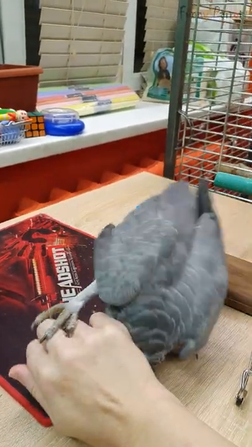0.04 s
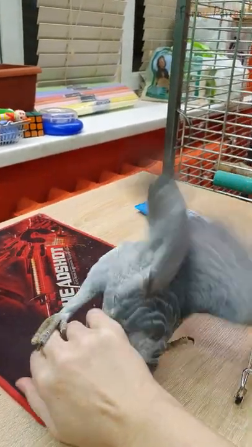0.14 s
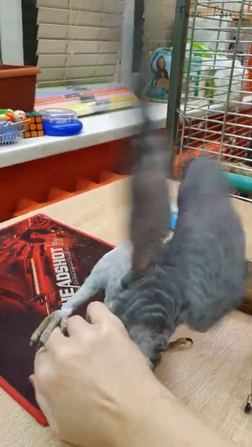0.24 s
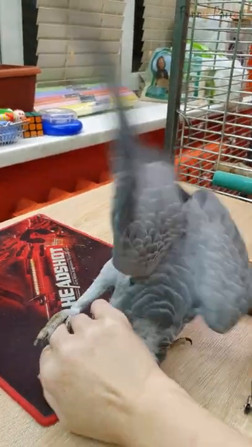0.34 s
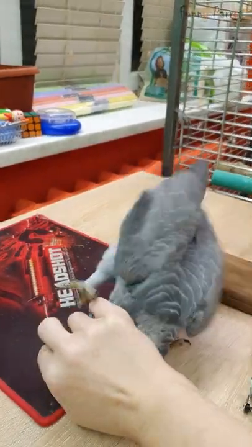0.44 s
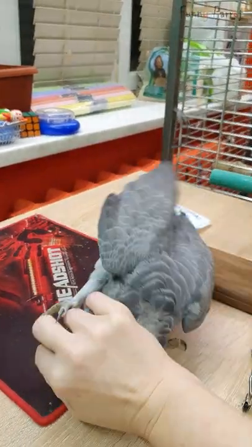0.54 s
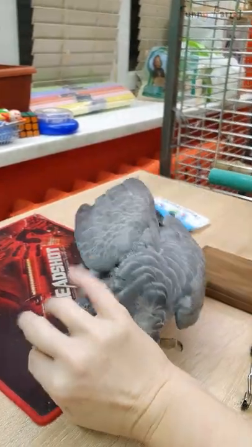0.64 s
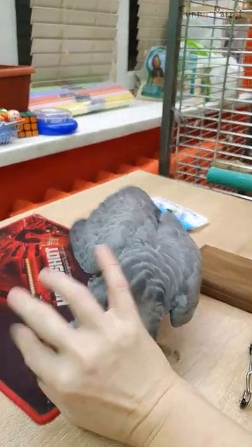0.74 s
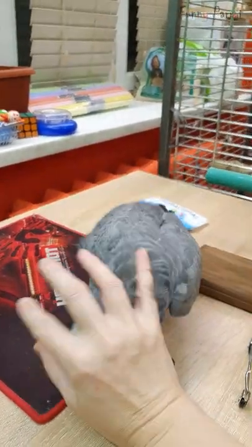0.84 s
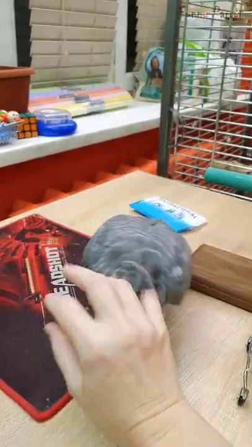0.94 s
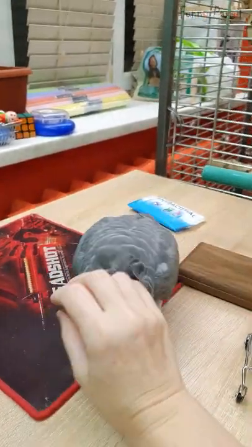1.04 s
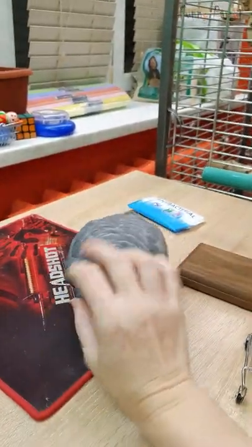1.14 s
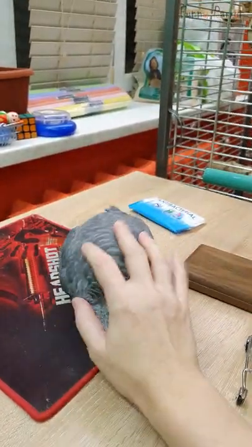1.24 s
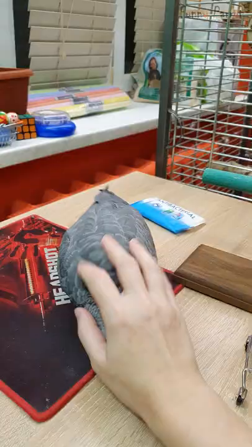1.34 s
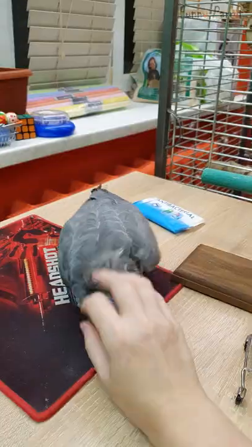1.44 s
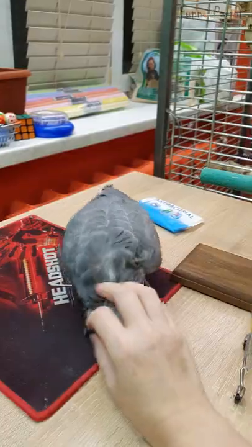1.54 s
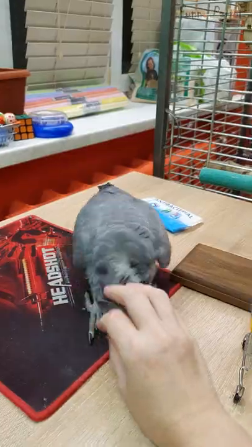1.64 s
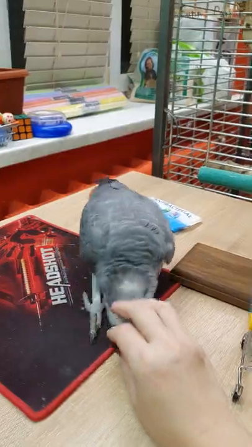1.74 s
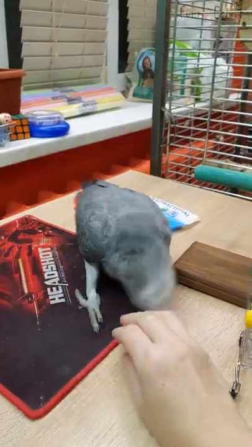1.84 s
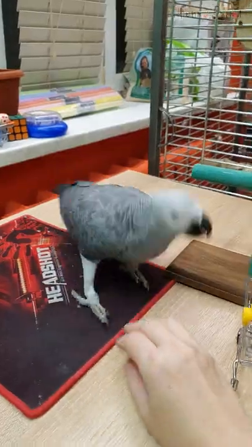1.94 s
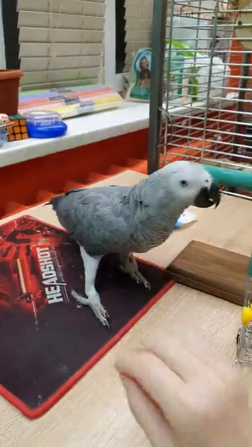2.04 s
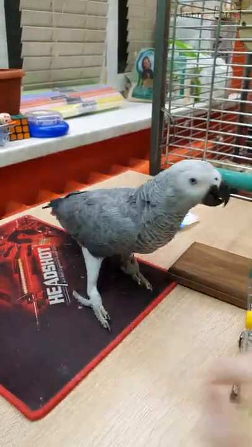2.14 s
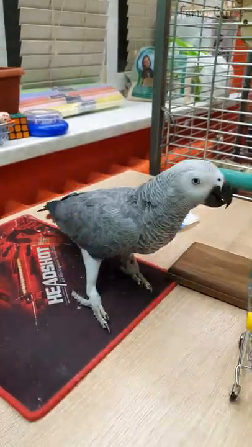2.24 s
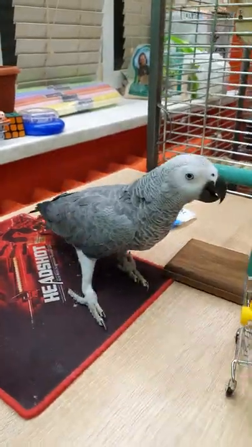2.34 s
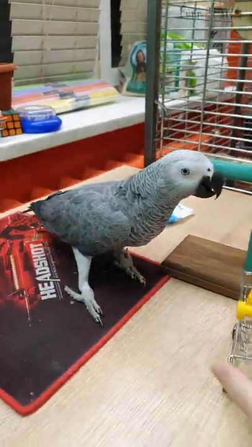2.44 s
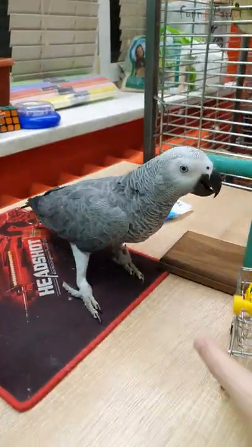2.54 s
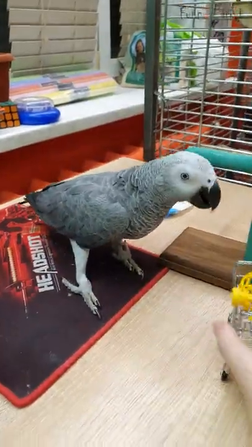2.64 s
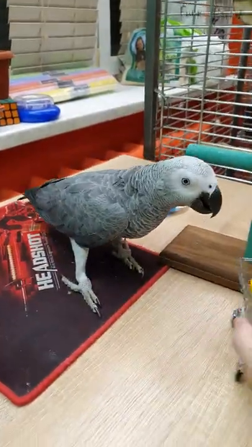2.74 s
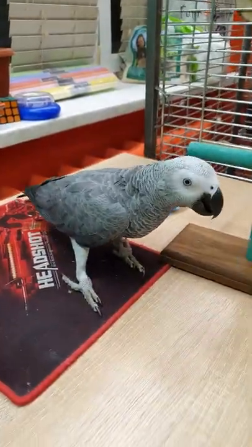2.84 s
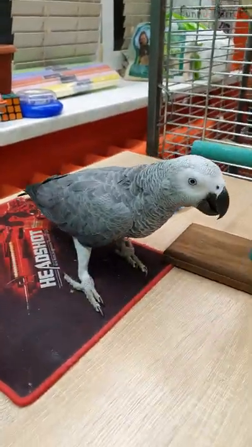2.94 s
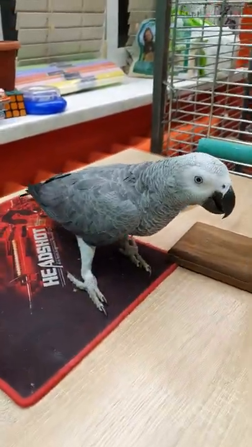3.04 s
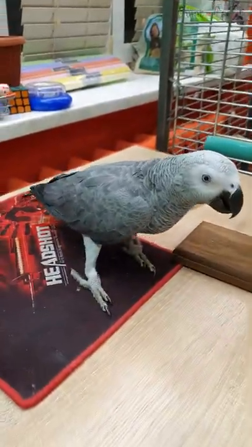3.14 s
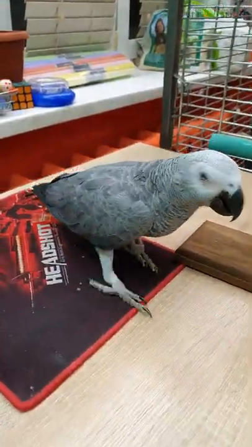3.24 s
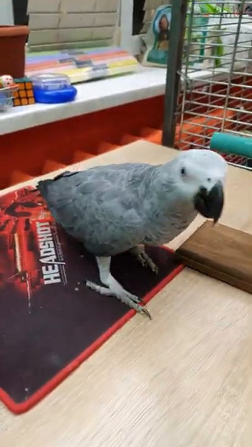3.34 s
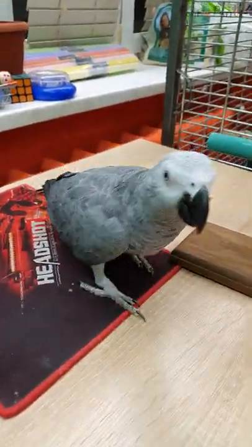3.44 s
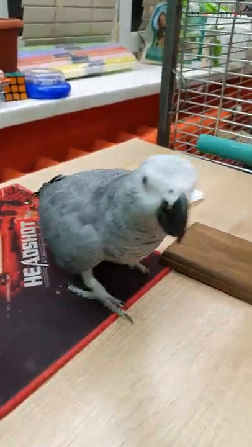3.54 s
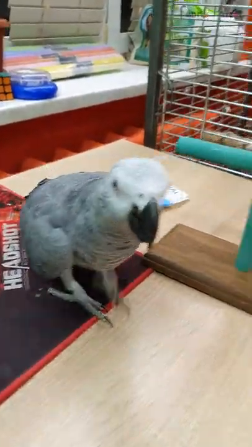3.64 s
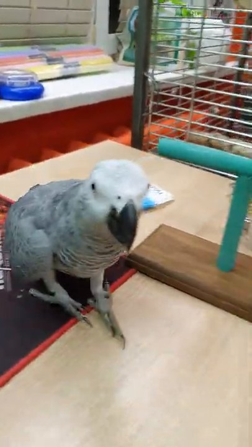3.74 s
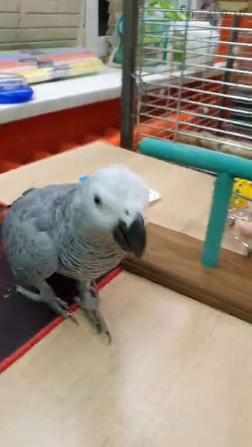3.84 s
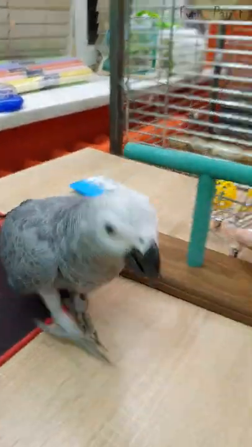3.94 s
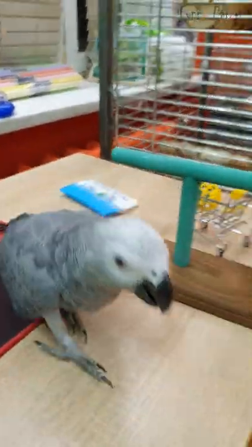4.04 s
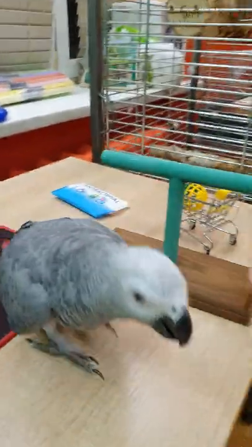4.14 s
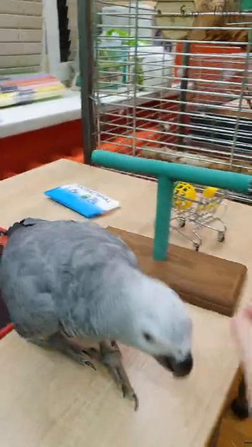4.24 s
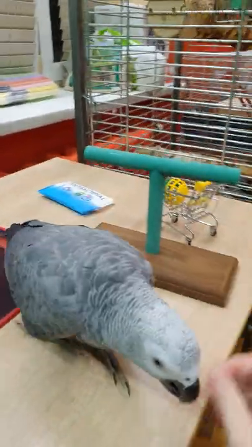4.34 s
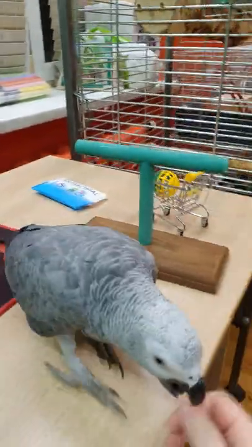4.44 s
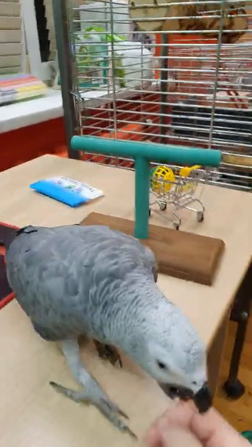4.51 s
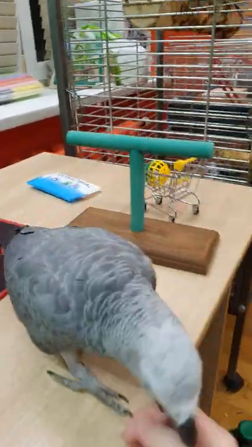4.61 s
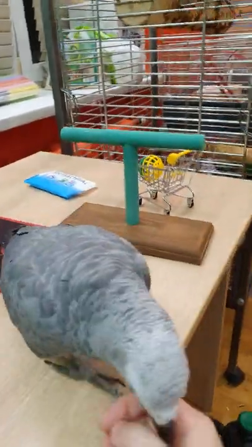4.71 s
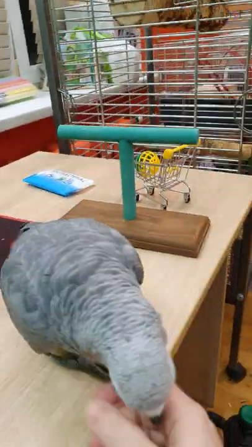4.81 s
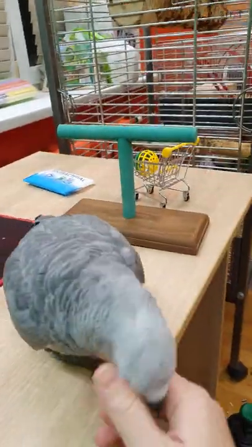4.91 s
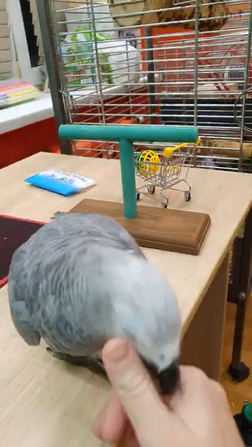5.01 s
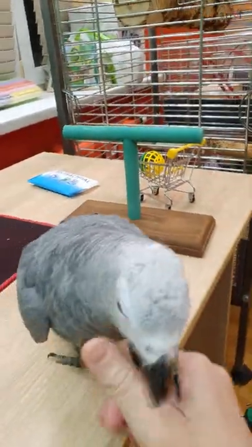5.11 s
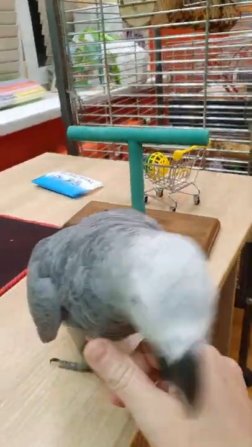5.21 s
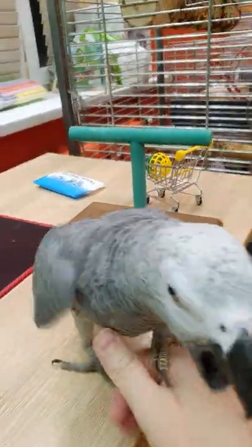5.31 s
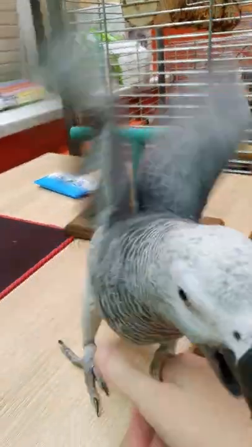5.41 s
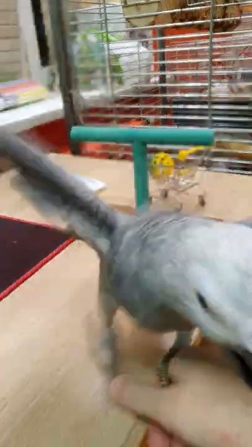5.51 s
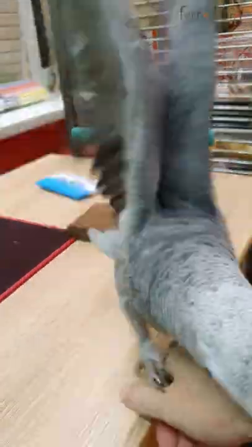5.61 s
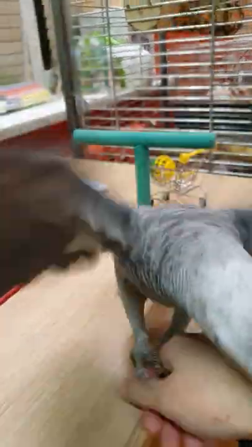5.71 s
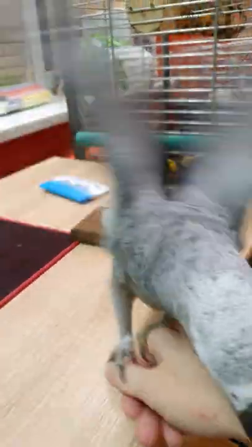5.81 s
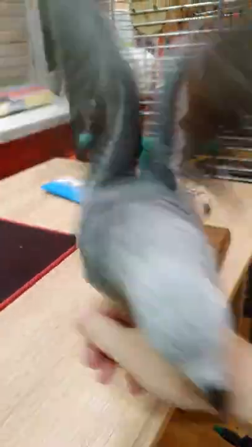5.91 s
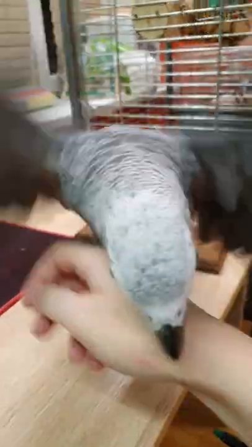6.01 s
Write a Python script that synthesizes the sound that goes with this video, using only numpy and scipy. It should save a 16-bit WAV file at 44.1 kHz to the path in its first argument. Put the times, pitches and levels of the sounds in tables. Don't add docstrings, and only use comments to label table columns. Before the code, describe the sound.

A parrot scuffles on a wooden desk with ticking claws, a wire toy jingles, a wooden stand scrapes hard, then wings flap and buffet the microphone.

```python
import sys
import numpy as np
from scipy import signal
from scipy.fft import rfft, irfft
from scipy.io import wavfile
from scipy.ndimage import uniform_filter1d

SR = 44100
rng = np.random.default_rng(int(sys.argv[2]) if len(sys.argv) > 2 else 0)


def digitize_waveform(pressure):
    field = np.atleast_2d(pressure).T
    bounded = np.clip(field, -1, 1)
    quanta = np.round(bounded * 32767).astype(np.int16)
    wavfile.write(sys.argv[1], SR, quanta)


def convert_level_to_amplitude(level_db):
    exponent = np.asarray(level_db, float) / 20
    return 10 ** exponent


N = 267510

# start_s, left_minus_right_db
BEARING = [(0.0, 0), (0.98, 0.5), (1.11, -4), (1.23, 2), (2.64, -2.5), (2.96, 3.5), (3.21, -3), (3.34, 6.5),
           (4.07, -1), (5.19, 4.5), (5.4, 1), (6.07, 2.5)]
# start_s, peak_db
LINK_FLICKS = [(2.743, -41), (2.769, -43), (2.83, -40), (2.8554, -32.5), (2.869, -40), (2.877, -37),
               (2.8902, -35.5), (2.905, -36.5), (2.918, -44.5), (2.93, -32.5), (2.94, -41.5),
               (2.947, -39.5), (2.966, -37.5), (2.993, -28.5), (2.998, -37.5), (3.014, -26), (3.022, -40),
               (3.037, -39), (3.045, -38.5), (3.061, -46.5), (3.0849, -38.5), (3.168, -44), (3.245, -42.5),
               (3.256, -46.5)]


def unit(x):
    return x / np.sqrt(np.mean(x ** 2))


def band(x, lo_hz, hi_hz, order=3):
    edges_hz = [lo_hz, min(hi_hz, .47 * SR)]
    return signal.sosfilt(signal.butter(order, edges_hz, "band", fs=SR, output="sos"), x)


def curve(rows):
    s, *columns = np.transpose(rows)
    return [np.interp(np.arange(N) / SR, s, c) for c in columns]


def spans(tables, fade_s):
    rows = [np.array(t, float) for t in tables]
    before = [t[:1].copy() for t in rows]
    after = [t[-1:].copy() for t in rows]
    for a, b, following in zip(before, after, rows[1:] + [[[N]]]):
        a[0, :2] = a[0, 0] - .002, -110
        b[0, :2] = min(b[0, 0] + fade_s, following[0][0] - .0021), -110
    return curve(np.concatenate([np.concatenate(x) for x in zip(before, rows, after)]))


def envelope(*tables):
    return convert_level_to_amplitude(spans(tables, 0.088)[0])


def flicker(rate_hz, db):
    k = int(SR / rate_hz)
    steps = np.repeat(rng.standard_normal(N // k + 1), k)
    return convert_level_to_amplitude(db * uniform_filter1d(steps, k)[:N])


def ring(x, modes):
    out = 0
    for hz, db, t60 in modes:
        r = np.exp(-np.log(1000) / (max(t60, .001) * SR))
        w = 2 * np.pi * hz / SR
        out = out + signal.lfilter([0, convert_level_to_amplitude(db) * r * np.sin(w)], [1, -2 * r * np.cos(w), r * r], x)
    return out


def rub(x, peaks):
    modes = [(hz, db + 20 * np.log10(w), np.log(1000) / np.pi / w) for hz, w, db in peaks]
    return unit(ring(x, modes))


def grains(per_s, scatter_db, channels=1):
    shape = (channels, N)
    happens = rng.random(shape) < per_s / SR
    size = convert_level_to_amplitude(scatter_db * rng.exponential(size=shape))
    return happens * size * rng.choice([-1., 1.], shape)


def impulses(events, offset_db):
    out = np.zeros(N)
    for s, db in events:
        out[int(s * SR)] = convert_level_to_amplitude(db + offset_db)
    return out


def decaying_tones(events, rise_s):
    out, t = np.zeros(N + 8192), np.arange(8192) / SR
    for s, db, hz, t60 in events:
        fade = np.minimum(t / rise_s, 1) * convert_level_to_amplitude(db - 60 * t / t60)
        out[int(s * SR):][:len(t)] += np.sin(2 * np.pi * hz * t) * fade
    return out[:N]


def strokes(s, length_s, db, t60, rise):
    s, length_s, db, t60 = (np.reshape(v, (-1, 1)) for v in (s, length_s, db, t60))
    t = np.arange(0, N, 16) / SR - s
    since = np.maximum(t - length_s, 0)
    onset = np.clip(t / (rise * length_s), 0, 1) ** 2
    return (onset * convert_level_to_amplitude(db - 60 * since / t60 - 59.0 * since ** 2)) ** 2, since


def summed(power):
    return np.sqrt(np.repeat(power.sum(0), 16)[:N])


def spread(x, pan_db):
    return x * convert_level_to_amplitude(np.array([pan_db, -pan_db]).reshape(2, -1) / 2)


def ticks(events, length_s):
    size = 2048
    near, sent = np.zeros((2, N + size)), np.zeros(N + size)
    t, f = np.arange(size) / SR, np.fft.rfftfreq(size, 1 / SR) + 1
    shape = np.exp(-np.abs(t - .002) / np.where(t < .002, .00015, length_s))
    noises = rng.standard_normal((len(events), 2, size))
    for (s, db, hz, octaves, wet_db), noise in zip(events, noises):
        colour = 1 / (1 + (np.log2(f / hz) / octaves) ** 4)
        noise = noise[0] + 0.63 * noise[1] * np.array([[1], [-1]])
        burst = irfft(rfft(noise * shape) * colour)
        burst = burst * convert_level_to_amplitude(db) / np.abs(burst.mean(0)).max()
        i = int((s - .001) * SR)
        near[:, i:i + size] += spread(burst, np.interp(s, *np.transpose(BEARING)))
        round_colour = (1 + (np.log2(f / (0.84 * hz)) / octaves) ** 4) ** -.7
        click = np.roll(irfft(round_colour), 100)
        same_energy = np.sqrt(np.sum(burst ** 2) / np.sum(click ** 2) / 2)
        sent[i:i + size] += click * same_energy * convert_level_to_amplitude(wet_db)
    return near[:, :N], sent[:N]


def floor():
    # pitch_hz, level_db (per Hz)
    spectrum = [(12, -46), (20, 4), (160, -17.5), (400, -22.5), (900, -26.5), (1390, -34.5), (9000, -71),
                (11700, -101)]
    # pitch_hz, width_hz, level_db (over the floor)
    hums = [(117, 2.3, 8), (217, 91, 7), (352.7, 8.3, 13.5), (440, 54, 6)]
    f = np.fft.rfftfreq(N, 1 / SR) + 1
    hz, db = np.transpose(spectrum)
    colour = convert_level_to_amplitude(np.interp(np.log(f), np.log(hz), db))
    colour = colour * convert_level_to_amplitude(sum(db * np.exp(-((f - hz) / w) ** 2) for hz, w, db in hums))
    colour = colour / (1 + (41 / f) ** 12)
    mid, side = rfft(rng.standard_normal((2, N)))
    side = side * np.clip(f / 600, .3, 1)
    hiss = unit(irfft(colour * np.array([mid + side, mid - side]), N))
    return hiss * convert_level_to_amplitude(-58.5) * flicker(1.9, 1.0)


def stir():
    # start_s, level_db
    openings = [
        [(0.95, -71), (1.616, -66.5), (2.1, -89)],
        [(3.95, -75), (4.08, -77), (4.396, -58.5), (5.3, -89)],
    ]
    hiss = unit(band(rng.standard_normal((2, N)), 450, 2300, order=2))
    return hiss * envelope(*openings) * flicker(17, 1.8)


def room(x):
    # pitch_hz, t60_s
    decay = np.array([(200, 0.4), (1000, 0.31), (3000, 1), (8000, 0.72), (15000, 0.93)])
    t, tail = np.arange(int(SR)) / SR, 0
    for hz in 125 * 2. ** np.arange(8):
        t60 = np.interp(np.log(hz), np.log(decay[:, 0]), decay[:, 1])
        octave = band(rng.standard_normal((2, len(t))), hz / np.sqrt(2), hz * np.sqrt(2), order=2)
        tilt_db = -1 * np.log2(hz / 2000)
        tail = tail + octave * min(hz / 300, 1) * convert_level_to_amplitude(tilt_db - 60 * t / t60)
    tail = tail * convert_level_to_amplitude(-25 * t ** 2)
    tail = tail * np.clip((t - .003) / .006, 0, 1)
    tail = tail * (1 + 0.5 * np.exp(-t / 0.0052))
    return signal.fftconvolve(x[None], tail / np.sqrt(np.sum(tail ** 2) / 2), axes=1)[:, :N]


def desk():
    # start_s, length_s, level_db, t60_s, deep_part_db
    shakes = [(3.778, 0.13, -39, 0.19, -24), (0.164, 0.017, -36, .5, -8), (2.618, 0.027, -44, 0.37, -16),
              (3.4, 0.055, -32, 0.4, -25), (0.14, 0.11, -25.5, 1.19, -10),
              (0.692, 0.031, -46.5, 0.95, -20.5), (2.636, 0.091, -31.5, 0.3, 1),
              (2.745, 0.063, -49.5, 0.74, 17.5), (3.28, 0.032, -25.5, 1.1, -1),
              (3.499, 0.1, -25, 1.55, -26), (5.352, 0.36, -49.5, 0.36, 3.5), (5.78, 0.31, -39, 0.37, -3)]
    # pitch_hz, width_hz, level_db
    plate_modes = [(158, 16, -1), (196, 30, -8), (227, 14, 0), (269, 16, -1), (320, 40, -11)]
    # pitch_hz, width_hz, level_db
    deep_modes = [(63, 59, -3.5), (87, 17, -3.5), (126.3, 12, 6.5)]
    s, length_s, db, t60, deep_db = np.transpose(shakes)
    power = strokes(s, length_s, db, t60, 0.81)[0]
    shake = rng.standard_normal((2, N))
    boom = summed(power) * rub(shake[0], plate_modes)
    deep = summed(power * convert_level_to_amplitude(2 * deep_db)[:, None]) * rub(shake[1], deep_modes)
    return band(boom + deep, 62, 320, order=4)


def desk_knocks():
    # start_s, peak_db, pitch_hz, t60_s
    hollow = [(0.58, -35, 438, 0.091), (0.599, -42, 392, 0.11), (0.623, -33, 448.6, 0.042),
              (2.31, -30.5, 431.5, 0.05), (2.334, -42.5, 218.6, 0.054), (2.356, -31.5, 409, 0.048),
              (2.37, -38.5, 484, 0.047), (2.389, -42.5, 307, 0.06), (3.157, -41, 440, 0.089),
              (3.179, -44.5, 450, 0.083), (3.201, -47, 415, 0.11), (4.48, -37.5, 258, 0.042)]
    # start_s, peak_db, pitch_hz, t60_s
    wing_slap = (5.774, -13, 262.5, 0.05)
    return convert_level_to_amplitude(2.0) * decaying_tones(hollow, 0.0065) + decaying_tones([wing_slap], 0.0015)


def perch():
    # start_s, level_db, post_against_base_db
    drag = [(3.28, -58, -2.5), (3.288, -34.5, -3.5), (3.36, -29.5, 2.5), (3.37, -35.5, -11),
            (3.42, -30, -0.5), (3.434, -22.5, 0.5), (3.445, -26.5, 2.5), (3.465, -22.5, 5),
            (3.484, -29, -3), (3.492, -34.5, -0.5), (3.502, -17, -9.5), (3.526, -25.5, -8.5),
            (3.538, -31.5, -1.5), (3.56, -24.5, -3), (3.62, -33, -15.5), (3.72, -40, -11),
            (3.894, -58.5, 3), (3.98, -82.5, 8)]
    # pitch_hz, width_hz, level_db
    base_modes = [(635, 20, -8), (731, 20, -8), (1062, 14, -1), (1084, 12, 2), (1158, 22, -1),
                  (1215, 18, -1), (1312, 24, -6), (1440, 50, -11), (500, 40, -11)]
    # pitch_hz, width_hz, level_db
    post_modes = [(1659, 26, 0), (1715, 40, -3), (1880, 80, -9), (2050, 100, -7), (2230, 90, -11),
                  (2850, 150, -22)]
    db, post_db = spans([drag], .08)
    slips = grains(900, 2.5, channels=2)
    base = band(rub(slips[0], base_modes), 370, 1550, order=2)
    post = band(rub(slips[1], post_modes), 1500, 3100, order=2)
    return (base + post * convert_level_to_amplitude(post_db)) * convert_level_to_amplitude(db - 3.5)


def sing():
    # start_s, level_db
    screw_level = [(3.42, -55), (3.44, -44.5), (3.56, -39), (3.72, -44), (3.9, -58)]
    # pitch_hz, width_hz, level_db
    screw_modes = [(1692, 12, 0), (1210, 20, -6), (2030, 20, -9)]
    # start_s, level_db
    drone_level = [(3.56, -58), (3.62, -34), (3.77, -37.5), (3.97, -55)]
    # pitch_hz, width_hz, level_db
    drone_modes = [(366, 50, -2), (440, 130, -4), (650, 50, 0)]
    slips = grains(700, 2.0, channels=2)
    screw = rub(slips[0], screw_modes) * envelope(screw_level)
    drone = band(rub(slips[1], drone_modes), 300, 800, order=2) * envelope(drone_level)
    return screw + drone


def cart():
    # start_s, peak_db, upper_wires_db
    jolts = [(2.66, -57, 24.5), (2.72, -52.5, 15.5), (2.745, -55, 13), (2.815, -56.5, 10.5),
             (2.855, -57, 12.5), (3.033, -54, -8.5), (3.085, -61, 7), (2.7851, -55, 13.5),
             (2.8913, -39.5, -10.5), (2.9317, -41, 7.5), (2.9644, -55, 1), (2.9941, -45, -15.5),
             (3.0126, -36, -10), (3.1652, -56.5, 9.5), (3.243, -60, 22)]
    # pitch_hz, level_db, t60_s
    basket_low = [(2125, 6.5, 0.18), (2200, -5, 0.1), (2140, -6, .1)]
    # pitch_hz, level_db, t60_s
    basket_high = [(3890, -4, .07), (5080, 0, .1), (5200, -2, .08), (6150, -8, .06)]
    # start_s, level_db
    jingle = [
        [(2.74, -55.5), (2.886, -53.5), (2.986, -63.5), (3.02, -51.5), (3.102, -64), (3.15, -72)],
        [(3.16, -74), (3.27, -57.5), (3.342, -58), (3.48, -71.5), (3.564, -65), (3.638, -57.5), (3.8, -70)],
    ]
    # pitch_hz, level_db, t60_s
    link_modes = [(8200, -4, 0.045), (8135, -2, 0.06), (8570, -9, 0.045), (5150, -12, 0.035)]
    # start_s, peak_db
    chinks = [(2.7427, -31), (2.7697, -36), (2.7777, -33), (2.814, -43), (2.8344, -40), (2.8563, -34),
              (2.873, -39.5), (2.995, -36), (3.0145, -33), (3.0845, -40), (3.0944, -38), (3.1812, -43.5),
              (3.258, -41.5), (3.3348, -37.5), (3.3453, -27.5), (3.3889, -31), (3.4184, -41.5),
              (3.5434, -34), (3.6213, -31.5), (3.6268, -32.5), (3.6656, -46), (3.7084, -41), (3.728, -40),
              (3.75, -41), (3.772, -46), (3.64, -32.5)]
    # pitch_hz, level_db, t60_s
    chink_modes = [(8125, 0, .08), (8200, -4, .045), (8290, -12, .03)]
    low = impulses([(s, db) for s, db, _ in jolts], -9.5)
    high = impulses([(s, db + rel_db) for s, db, rel_db in jolts], -14.0)
    rattle = 1 + 0.22 * uniform_filter1d(rng.standard_normal(N), size=150) * np.sqrt(150)
    basket = (ring(low, basket_low) + ring(high, basket_high)) * rattle
    link = unit(ring(grains(250, 1.5)[0], link_modes)) * envelope(*jingle) * convert_level_to_amplitude(7) * flicker(27, 2.5)
    flicked = ring(impulses(LINK_FLICKS, -22.5), link_modes)
    return flicked + ring(impulses(chinks, -2.0), chink_modes) + basket + link


def link_ticks():
    return ticks([(s, db, 10300, 0.28, -3.5) for s, db in LINK_FLICKS], 0.0016)


def snap_ticks():
    # start_s, peak_db, wall_share_db
    snaps = [(0.2316, -12, -12), (0.4408, -25.5, -2), (0.5824, -45, -7), (2.6863, -22.5, 1),
             (4.0112, -38.5, -2.5), (4.2575, -39, 6), (4.5278, -36, -7.5)]
    return ticks([(s, db, 8700, 1, wet_db) for s, db, wet_db in snaps], 0.0016)


def scratch_ticks():
    # start_s, peak_db, centre_hz, width_octaves
    scratches = [(.0125, -54, 2320, 0.33), (0.0596, -36.5, 2350, 0.4), (0.0917, -33.5, 2640, 0.33),
                 (0.102, -32.5, 2420, 0.47), (0.112, -29.5, 2600, 0.37), (.565, -51, 660, .3),
                 (.5826, -36, 2100, 0.59), (.608, -36.5, 2600, 0.82), (.61, -43, 650, 0.2),
                 (.78, -45.5, 3400, .2), (.864, -28, 2700, 0.26), (.864, -35, 4120, 0.38),
                 (2.595, -66.5, 6500, .3), (2.601, -62, 6500, 0.42), (2.607, -53, 6500, 0.35),
                 (2.613, -55.5, 6500, .3), (2.66, -42, 8940, 0.32), (2.635, -44, 1040, 0.18),
                 (2.652, -45, 1000, 0.17), (2.668, -41, 1000, 0.1), (3.085, -49.5, 8000, .4),
                 (3.242, -36, 5500, 0.93), (3.166, -41.5, 5000, 0.55), (1.848, -48, 3000, 0.72),
                 (2.645, -48.5, 6000, 0.53), (3.309, -25.5, 1960, 0.24), (3.333, -23.5, 4000, 0.2),
                 (3.338, -27, 3770, 0.16), (3.345, -26, 4700, 0.26), (3.352, -32, 2700, 0.13),
                 (3.568, -53, 4700, .3), (3.716, -36, 1710, 0.091), (5.565, -33, 1500, 0.39),
                 (5.775, -30.5, 1850, 0.64), (2.716, -29, 4500, 0.85), (2.73, -29, 3500, 0.4),
                 (2.757, -38.5, 5000, .6), (2.79, -34.5, 4200, .6), (2.83, -41.5, 5500, 0.77),
                 (2.93, -35.5, 4500, 0.39), (3.012, -36, 5000, 0.88), (5.905, -18.5, 1980, 0.72)]
    return ticks([row + (-3.0,) for row in scratches], 0.0026)


def tap_ticks():
    # start_s, peak_db, centre_hz, width_octaves
    taps = [(0.122, -24, 2680, 0.95), (0.17, -24, 1900, 0.36), (.231, -20, 750, 0.27),
            (.454, -30.5, 1960, 0.4), (.695, -37, 770, 0.45), (.714, -28, 1120, 0.87),
            (.864, -30.5, 1560, 0.34), (1.11, -28.5, 1840, 0.93), (1.147, -32.5, 2195, 0.65),
            (1.824, -51, 634, 0.5), (1.848, -43, 740, 0.37), (2.693, -24.5, 663, 1.07),
            (3.289, -18, 1360, 0.41), (3.555, -20, 1130, 0.67), (3.866, -33.5, 1800, 0.47),
            (3.8646, -33, 6000, 0.53), (4.325, -35, 1480, 1.17), (2.623, -36, 5150, 0.56),
            (1.654, -53, 1264, 0.98), (4.374, -42, 2450, 0.58), (4.531, -40, 2640, 0.2),
            (4.781, -42, 2660, 0.5)]
    return ticks([row + (-0.5,) for row in taps], 0.0051)


def struck_tones():
    # start_s, peak_db, pitch_hz, t60_s
    pecks = [(.123, -31, 4000, .012), (.124, -24.5, 2295, 0.02), (.169, -21, 1880, 0.033),
             (.455, -37, 1830, .05), (.714, -31, 2440, 0.015), (.716, -33, 520, .04), (.89, -35, 1330, .03),
             (.902, -33, 1510, .025), (.918, -32, 1330, .035), (.946, -37, 1400, .025),
             (.958, -41, 1300, .03), (1.110, -23, 2300, 0.018), (1.825, -56, 780, .08),
             (1.848, -50, 1990, .09), (3.292, -24, 158, .3), (3.362, -25, 200, .15),
             (3.434, -27, 1160, .06), (3.462, -31, 1690, .07), (3.504, -27, 1084, .08),
             (3.514, -26, 1160, .07), (4.325, -40.5, 1567, 0.069), (4.326, -43, 2450, 0.039),
             (5.792, -43, 4450, .04), (3.163, -49, 3880, .035), (2.928, -43, 5060, .04),
             (.123, -33, 1660, .04), (.25, -34, 830, .12), (.29, -36, 850, .2)]
    return decaying_tones(pecks, 0.00087)


def draught():
    # start_s, level_db
    beats = [(5.549, -31), (5.736, -29.5), (5.87, -26.5), (5.95, -37.5), (6.012, -26.5)]
    # start_s, peak_db, pitch_hz, t60_s
    thumps = [(5.585, -30, 50, 0.048), (5.623, -22, 53, 0.076), (5.778, -17.5, 101, 0.083),
              (5.908, -17.5, 54.7, 0.13), (5.957, -22, 59.6, 0.082), (5.972, -21, 50, 0.14),
              (6.038, -14.5, 63, 0.17)]
    s, db = np.transpose(beats)
    eddies = rng.standard_normal(N) + 0.6 * rng.standard_normal((2, N))
    wind = unit(band(eddies, 31, 74, order=2)) + 0.2 * unit(band(eddies, 150, 470, order=2))
    gusts = summed(strokes(s, 0.039, db, 0.47, 0.86)[0])
    return wind * gusts + spread(decaying_tones(thumps, 0.0048), 1.4)


def quills():
    # start_s, level_db
    opening = [(5.312, -64.5), (5.324, -49), (5.365, -37.5), (5.385, -30.5), (5.45, -32.5), (5.575, -43.5),
               (5.8, -61)]
    # pitch_hz, width_hz, level_db
    quill_bands = [(2450, 430, 4), (2930, 180, -3), (3720, 230, 5.5), (5150, 850, -5), (6170, 270, -3.5),
                   (6960, 550, 2.5), (8600, 1000, -1.5), (10220, 500, -2.5), (10850, 358, 3),
                   (13450, 2500, -17)]
    hiss = rng.standard_normal((2, N)) + 0.46 * rng.standard_normal(N)
    bands = band(rub(hiss, quill_bands), 2100, 15000)
    press = flicker(40, 1.2)
    at = np.cumsum(press ** .12)
    bands = np.array([np.interp(at * N / at[-1], np.arange(N), side) for side in bands])
    open_s = 5.375
    shut = np.clip((open_s - np.arange(N) / SR) / .015, 0, 1)
    gap = signal.lfilter(*signal.iirpeak(3790, 4, fs=SR), bands)
    return (bands - 0.7 * shut * gap) * envelope(opening) * press


def scuffle():
    # start_s, length_s, level_db, t60_s, brightness_db
    rustles = [(-.03, 0.052, -56.5, 0.39, 7.5), (0.54, 0.11, -52.5, 0.37, -21), (5.54, .03, -49.5, 0.14, 9),
               (5.638, 0.022, -56, 0.11, 1.5), (5.81, 0.013, -40.5, 0.19, 5),
               (0.116, 0.0075, -40.5, 0.35, 3), (1.272, 0.0053, -56, 0.29, -6),
               (1.816, 0.065, -51, 0.42, -27), (2.852, 0.15, -52, 0.76, -2), (5.366, 0.54, -41, 0.44, 0),
               (5.897, 0.016, -37, 0.26, 9.5), (5.906, 0.27, -29.5, 0.41, -1)]
    # start_s, length_s, level_db, t60_s, brightness_db
    slides = [(.166, 0.0044, -32.5, 0.11, -0.5), (.18, 0.048, -31.5, 0.46, -7),
              (0.232, 0.006, -23.5, 0.1, -1), (0.241, 0.019, -26.5, 0.83, -3), (.64, 0.068, -58, 0.34, -39),
              (0.706, 0.011, -39, 0.6, -63.5), (2.598, 0.096, -46, 0.32, -28),
              (2.687, 0.045, -32, 0.6, -11), (3.284, 0.07, -30, 0.44, -7), (3.33, 0.21, -33.5, .3, -10),
              (3.555, 0.0051, -22.5, 0.073, 4), (3.566, 0.016, -29.5, 1.35, -1.5)]
    # resonance_hz, low_part_db, air_db (against the body)
    rows = [r + (1980, -7, -0.5) for r in rustles] + [r + (1720, -0.75, 0) for r in slides]
    s, length_s, db, t60, sheen_db, hz, low_db, air_db = np.transpose(rows)[:, :, None]
    power, since = strokes(s, length_s, db - 4, t60, 0.33)
    body = summed(power)
    body_hz = (summed(power * hz) ** 2 + 1e-12) / (body ** 2 + 1e-15)
    air_db = air_db + 0.44 * sheen_db - 33 * since
    hiss = rng.standard_normal((2, N)) + 0.12 * rng.standard_normal(N)
    out = 0.53 * unit(band(hiss, 1000, 3300))
    for hz in 1150 * 1.3 ** np.arange(4):
        near = np.exp(-(np.log(body_hz / hz) / 0.23) ** 2)
        patch = unit(band(hiss, hz / 1.14, hz * 1.167, order=2))
        out = out + 0.73 * near * patch * flicker(45, 2.2)
    out = out * body
    for lo, hi, rel_db in [(338.3, 1046, low_db), (3870, 7200, sheen_db), (6500, 15000, air_db)]:
        out = out + unit(band(hiss, lo, hi)) * summed(power * convert_level_to_amplitude(2 * rel_db)) * flicker(30, 2.34)
    return spread(out, curve(BEARING)[0])


def claw_drag():
    # start_s, level_db
    drag = [(0.872, -46), (0.88, -53), (0.904, -45), (.97, -58), (1.08, -65)]
    # pitch_hz, width_hz, level_db
    hollow_modes = [(1316, 120, -5.5), (1510, 190, 0), (2430, 300, -6), (2850, 610, -4)]
    slips = band(rub(grains(420, 2.5)[0], hollow_modes), 1170, 3300, order=5)
    return slips * envelope(drag) * flicker(62, 1.6) * convert_level_to_amplitude(2.5)


def claw_ticks():
    # start_s, peak_db, wall_share_db
    claws = [(0.012, -26.5, -4), (0.058, -25, -2), (0.0621, -23.5, -6), (0.091, -23, -9), (0.1, -24, 6),
             (0.564, -35.5, 4.5), (.607, -41.5, -30), (0.8925, -36.5, 5), (0.9108, -37, -5),
             (0.942, -34, 4), (0.9552, -31, -13), (1.0228, -33, -5), (1.183, -48, -4.5),
             (1.2004, -40.5, -3.5), (1.269, -38, 6), (1.2819, -37, -17), (1.852, -46.5, -15),
             (2.6965, -13.5, -2.5), (3.2873, -15, 5), (3.556, -7.5, -6.5), (4.0112, -26, 1.5),
             (4.0324, -34, -24), (4.2562, -36.5, 8), (4.2658, -36, -9), (4.287, -38, -12),
             (4.5279, -32.5, 8), (4.778, -41, 12.5), (5.032, -44.5, 0), (5.1143, -53, -7),
             (5.9009, -14, 3.5)]
    return ticks([(s, db, 5250, 1, wet_db) for s, db, wet_db in claws], 0.0016)


def scene():
    impacts = [claw_ticks(), snap_ticks(), link_ticks(), tap_ticks(), scratch_ticks()]
    direct = sum(near for near, _ in impacts)
    sent = sum(to_walls for _, to_walls in impacts)
    wires, wood, boom, foot, wings = cart(), perch(), desk(), claw_drag(), quills()
    knocks, pecks = desk_knocks(), struck_tones()
    sent = sent + convert_level_to_amplitude(-1.5) * (0.88 * wires + wood) + convert_level_to_amplitude(-16.5) * boom
    sent = sent + convert_level_to_amplitude(-2.0) * (knocks + pecks + foot) + convert_level_to_amplitude(-4.0) * wings[0]
    toys = spread(wires, 0.5)
    toys = toys + spread(np.array([np.roll(wood, shift=9), wood]), -8.0)
    toys = toys + spread(boom + knocks, 0.16) + spread(pecks + foot, -1.5) + spread(sing(), -2.5)
    bird = direct + spread(convert_level_to_amplitude(-0.5) * wings, 2.5) + scuffle() + draught()
    return bird + toys + room(sent) + stir() + floor()


def roll_off(x):
    return signal.sosfilt(signal.butter(12, 16530, fs=SR, output="sos"), x)


def record(dry):
    soft = signal.lfilter(*signal.butter(1, 11000, fs=SR), np.tanh(1.266 * dry) / 1.344)
    dip_hz, dip_width_hz = 7780, 800
    soft = soft - 0.41 * signal.lfilter(*signal.iirpeak(dip_hz, dip_hz / dip_width_hz, fs=SR), soft)
    top_cut = signal.ellip(8, .2, 70, 16000, fs=SR, output="sos")
    return roll_off(signal.sosfilt(top_cut, soft))


dry = scene()
out = record(dry)
digitize_waveform(out)
```